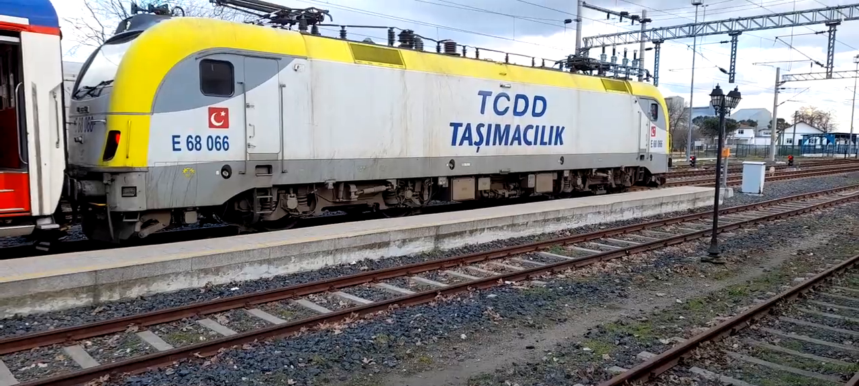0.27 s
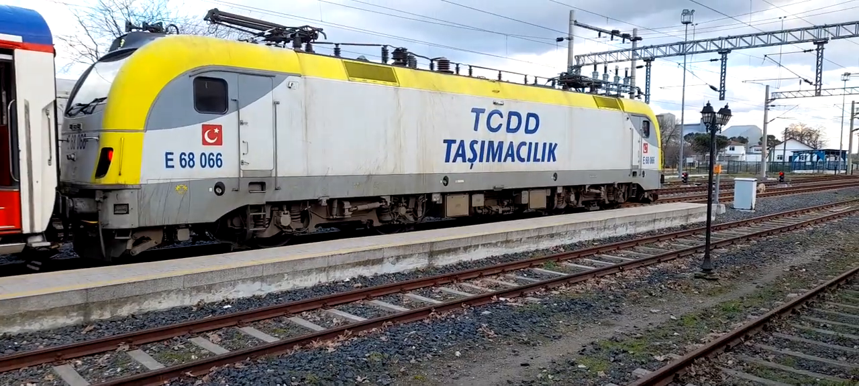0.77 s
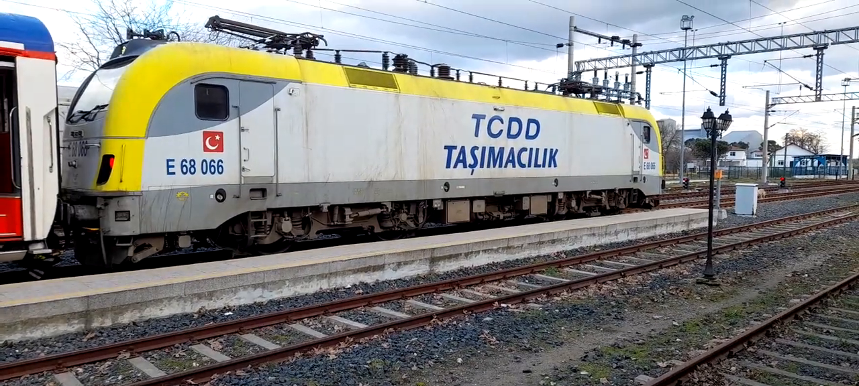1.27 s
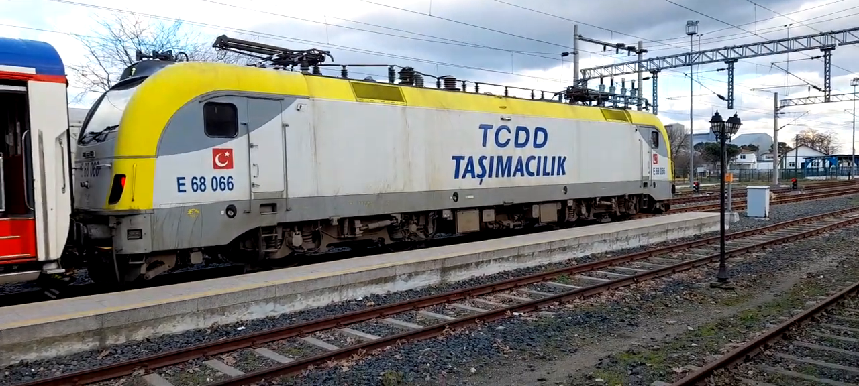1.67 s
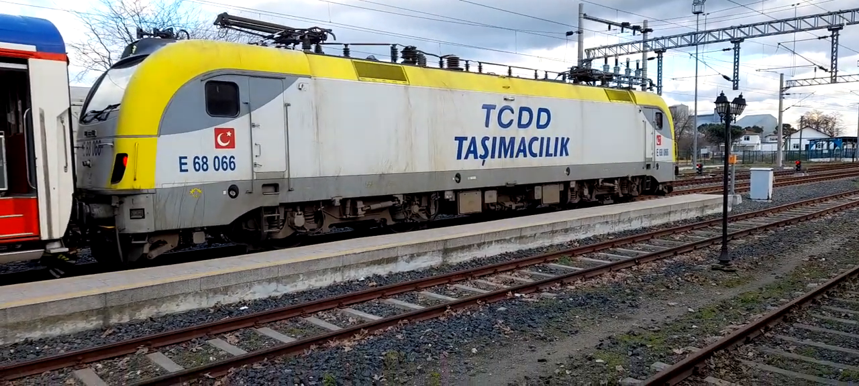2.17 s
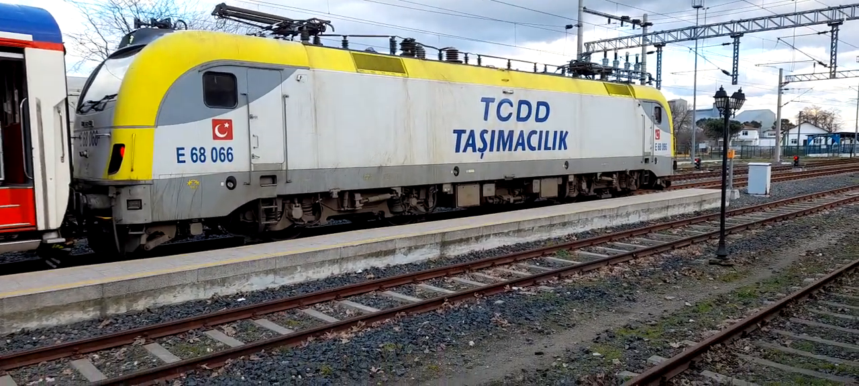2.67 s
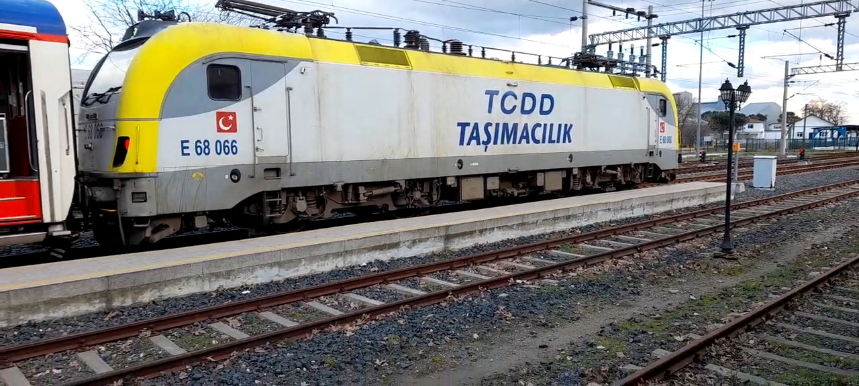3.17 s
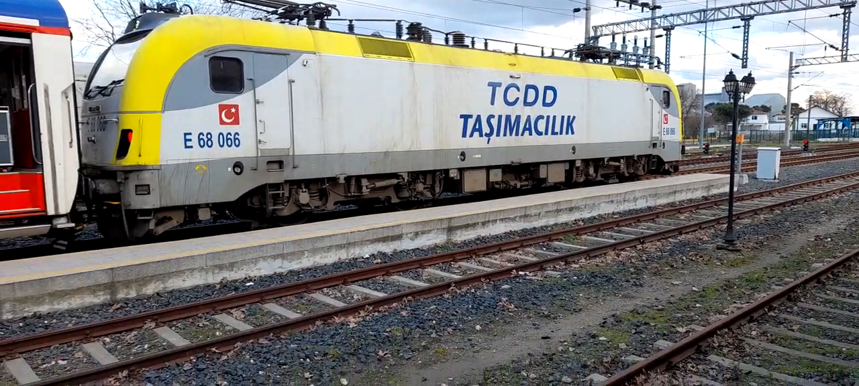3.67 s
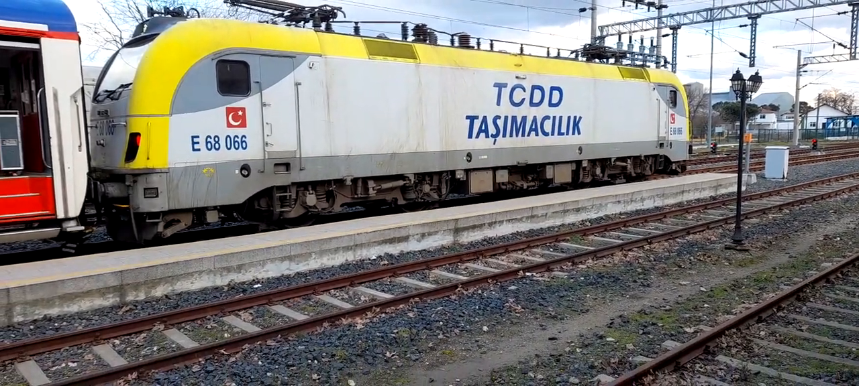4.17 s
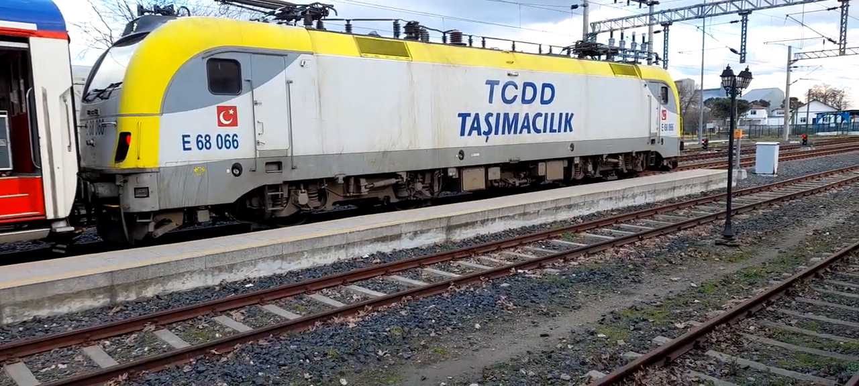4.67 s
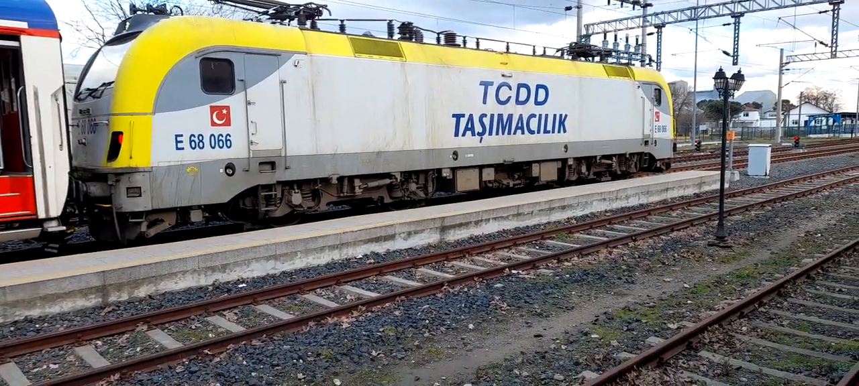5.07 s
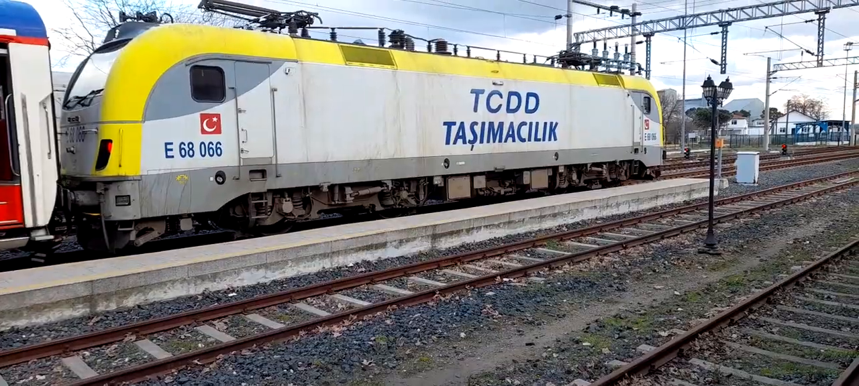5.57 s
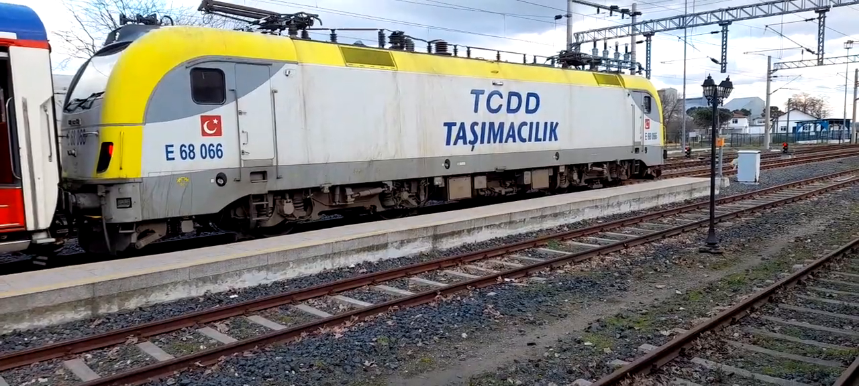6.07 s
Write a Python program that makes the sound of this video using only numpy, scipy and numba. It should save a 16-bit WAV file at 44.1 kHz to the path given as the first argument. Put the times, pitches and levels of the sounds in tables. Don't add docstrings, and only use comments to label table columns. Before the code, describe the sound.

Open station yard with a soft hum and low wind rumble. A few faint bird chirps come first. Then a standing locomotive's valve snaps open with a tiny rising whistle and blasts compressed air for about a second, shutting abruptly into a short reverberant tail. Later a thin, quiet leak hisses on while gusts increasingly thump the stereo phone microphone, strongest near the end and toward the right.

```python
import sys
import numpy as np
from scipy import signal
from scipy.fft import rfft, irfft, next_fast_len
from scipy.io import wavfile
from scipy.ndimage import uniform_filter1d
from numba import njit

SR = 44100
rng = np.random.default_rng(int(sys.argv[2]) if len(sys.argv) > 2 else 0)


def to_wav(s):
    ch = np.atleast_2d(s).T
    pcm = np.round(np.clip(ch, -1, 1) * 32767)
    wavfile.write(sys.argv[1], SR, pcm.astype(np.int16))


def undo_db(level):
    steps = np.asarray(level, float) / 20
    return 10 ** steps


N = 278932

# time in seconds, gain in dB.
PHONE_GAIN = [(0, -2.5), (1.2, 1.06), (2.4, -1.5), (2.75, -9), (3.2, -14), (3.9, -6.5), (4.7, -1),
              (5.5, -0.5), (6.33, -3)]
# frequency in Hz, lead of the left port in radians.
PORT_LEAD = [(0, -1.5), (780, 0.8), (2240, 3.5), (3360, 6), (5430, 13), (8270, 14), (13000, 17),
             (16600, 21), (22050, 27)]
# frequency in Hz, left level in dB per Hz, right level in dB per Hz.
YARD_SPECTRUM = [(200, -82.5, -85.5), (310, -76, -71), (400, -78, -78), (766, -82, -80.5),
                 (980.1, -80, -80), (1362.4, -86.5, -85.5), (1740, -84.5, -84), (2300, -91, -89),
                 (2799, -103.3, -101.9), (3867, -105.4, -107.2), (5480, -107.1, -110.0),
                 (6652, -106.2, -108.8), (8100, -119.9, -119.8), (13000, -109.5, -111.3)]
# frequency in Hz, level in dB per Hz.
RUMBLE_SPECTRUM = [(12, -41.5), (25, -11.5), (45, -4.5), (65, 2), (90, 0.5), (120, 0), (160, -9.5),
                   (210, -18), (280, -17), (400, -36.5), (700, -67.5)]
# time in seconds, level in dB.
BREEZE = [(0, -47), (1.0, -45), (2.4, -51.5), (3.1, -54), (3.5, -45.5), (4.3, -41.5), (5.2, -37.5),
          (5.6, -29.5), (6.08, -34.5), (6.2, -42), (6.33, -28.5)]
# centre in seconds, level in dB, left minus right in dB.
GUSTS = [(0.37, -37.5, -21), (0.67, -46, -5), (0.87, -51, -14), (1.12, -37.5, -2.5), (1.36, -41, -24),
         (1.59, -41, -8), (1.74, -42, -5), (2.0, -42, -7), (2.17, -43.5, -6), (2.34, -42.5, -14),
         (2.6, -42, -3), (2.78, -49, -13), (2.91, -47, -16), (3.29, -42.5, -15), (3.88, -34.0, -11),
         (3.99, -35, -6), (4.2, -35.5, -12), (4.53, -35, -9), (4.76, -40, 2.5), (5.07, -32, -4.5),
         (5.34, -33.5, -27), (5.7, -25.5, -11.5), (5.89, -41, -10.5)]
# centre in seconds, level in dB, left minus right in dB.
SIDE_GUSTS = [
    (.04, -43.5, -7),
    (.25, -46, 16),
    (3.62, -44.5, 0),
    (4.42, -38, 9),
    (5.5, -32.5, 13),
    (6.3, -33, -16),
]
# centre in seconds, peak in dB, pitch in Hz.
LEFT_BUFFETS = [
    (3.973, -28.5, 109),
    (4.439, -24, 121),
    (4.755, -30, 147),
    (5.513, -21, 133),
    (5.65, -18, 131),
    (5.67, -14, 110),
]
# centre in seconds, peak in dB, pitch in Hz.
RIGHT_BUFFETS = [(3.86, -23, 90.5), (3.902, -29, 96), (4.011, -20.5, 107.5), (4.463, -20.5, 89.3),
                 (4.534, -19.5, 95), (5.025, -20.5, 91), (5.081, -26, 93), (5.359, -16.5, 100),
                 (5.459, -32, 95.4), (5.654, -12.5, 171), (5.678, -8.5, 118.5), (5.69, -13, 244.4),
                 (5.714, -14, 238), (5.7219, -10.5, 137), (5.735, -19, 240), (5.745, -16, 99.3),
                 (5.874, -21, 129.8), (5.898, -14.5, 110), (6.286, -15, 94)]
# start in seconds, start pitch in Hz, length in seconds, peak in dB,
# left minus right in dB.
BIRDS = [
    (.096, 1780, 0.028, -52.5, -4.5),
    (.575, 2685, 0.017, -57, -3),
    (.587, 2580, 0.022, -50.5, 0),
    (.615, 2587, 0.029, -55, -1),
    (.823, 2650, 0.024, -50, -1),
    (.845, 2800, 0.017, -52, -6),
    (.895, 2960, .028, -58.5, 2),
    (.92, 2360, 0.031, -57.5, 0),
]
# peak in dB, left minus right in dB.
SQUEAK_HARMONICS = [
    (-59, -3),
    (-57.5, -11),
    (-66, 9.5),
    (-72, 5),
]
# start in seconds, start pitch in Hz, length in seconds, peak in dB,
# left minus right in dB.
PINGS = [
    (3.80, 2160, 0.087, -68, 3.28),
    (5.316, 4230, 0.0085, -54.5, 17),
    (6.045, 1150, 0.029, -54.5, -4),
    (6.262, 464, 0.057, -47.5, -2),
]
# centre in Hz, width in Hz, level in dB,
# start in seconds, stop in seconds.
HUMS = [
    (2090, 150, -63.5, 3.75, 7.9),
    (977, 100, -63, 2.85, 3.7),
    (300, 94, -50, 1.2, 2.6),
    (299, 32, -42, 1.898, 2.5),
    (288, 31, -58.5, 2, 2.95),
    (304.93, 84, -59.5, 4.9, 5.7),
]
# time in seconds, centre in Hz, peak in dB.
KNOCKS = [
    (4.565, 2200, -53),
    (5.318, 1700, -50.5),
    (3.355, 1000, -58),
]
# time in seconds, pitch in Hz, level in dB.
WHISTLE = [(1.372, 5000, -64.5), (1.384, 5402, -35.5), (1.390, 5681, -18.5), (1.400, 5872, -8),
           (1.410, 7572, -13), (1.420, 8605, -13), (1.432, 11300, -21.5), (1.445, 12000, -22.5),
           (1.47, 12280, -45)]
# frequency in Hz, left level in dB per Hz, right level in dB per Hz.
BLAST_SPECTRUM = [(325.3, -64.5, -56.5), (650, -66, -68), (1270, -64.5, -60.5), (1750, -63.5, -54),
                  (2500, -59, -56.5), (3823, -62, -63), (4166.7, -54.5, -60), (5495, -54.5, -63.5),
                  (6660, -51, -48), (7630, -66, -59), (8342.5, -67, -62.5), (10500, -56, -61),
                  (12000, -50.5, -59.5), (14800, -59, -53)]
# frequency in Hz, left level in dB per Hz,
# right level in dB per Hz.
TAIL_SPECTRUM = [(201, -79, -76), (298.2, -72.5, -66), (430, -77, -77), (799, -78, -74.5),
                 (1760, -69.5, -66), (3700, -68.5, -68), (5500, -66, -72.5), (6700, -64.5, -62.5),
                 (8100, -81, -81), (12000, -70, -71), (15000, -70, -70.5)]
# frequency in Hz, left level in dB per Hz, right level in dB per Hz.
LEAK_SPECTRUM = [(2200, -91.5, -87), (2940, -99, -96.5), (3440, -92, -89.5), (4350, -99, -101.4),
                 (5940, -93.5, -100), (6930, -99.0, -92.5), (7440, -104.0, -103.2), (8570, -99.5, -99.5),
                 (10200, -100.5, -96.5), (11000, -104, -105), (12000, -98.5, -99.4), (13500, -96.5, -95.5),
                 (14380, -96, -100), (15500, -101.2, -103.1)]

VALVE_SHUTS_S = 2.423


def curves(table):
    s, *columns = np.transpose(table)
    return np.array([np.interp(np.arange(N) / SR, s, column) for column in columns])


def walk(rate):
    hold = int(SR / rate)
    steps = np.repeat(rng.standard_normal(400), hold)[:N]
    return 1.3 * uniform_filter1d(uniform_filter1d(steps, hold), hold)


def split(x, hz):
    low = signal.sosfiltfilt(signal.butter(2, hz, fs=SR, output="sos"), x)
    return low, x - low


def colour(x, table, under_db=-39.5, tilt=0, swell_db=0, flicker_db=0, rate=12, count=1):
    size = next_fast_len(N)
    octave = np.log2(np.fft.rfftfreq(size, 1 / SR) + 1)
    hz, *columns = np.transpose(table)
    edge = under_db * np.maximum(np.log2(hz[0]) - octave, 0)
    levels = [np.interp(octave, np.log2(hz), column) + edge for column in columns]
    shaped = rfft(x, size) * undo_db(levels) * np.sqrt(SR / 2)
    out = 0
    for centre in np.arange(7, 14.1, 1 / count):
        distance = np.clip(np.clip(octave, 7, 14) - centre, -1 / count, 1 / count)
        band = np.cos(distance * count * np.pi / 2) ** 2
        gain_db = swell_db + tilt * (centre - 10) + flicker_db * walk(rate)
        out = out + irfft(shaped * band, size)[:, :N] * undo_db(gain_db)
    return out


@njit
def resonator(x, hz, width):
    out, band, low = np.empty(len(x)), 0., 0.
    for i in range(len(x)):
        g, damping = np.tan(np.pi * hz[i] / SR), width[i] / hz[i]
        v = (band + g * (x[i] - low)) / (1 + g * (g + damping))
        band, low = 2 * v - band, low + 2 * g * v
        out[i] = damping * v
    return out


def ports(x, lead_scale):
    size = next_fast_len(N)
    lead = lead_scale * np.interp(np.fft.rfftfreq(size, 1 / SR), *np.transpose(PORT_LEAD))
    return np.array([irfft(rfft(x, size) * np.exp(1j * lead), size)[:N], x])


def echoes(x, echo_db, t60):
    t = np.arange(SR // 2) / SR
    path = rng.standard_normal((2, len(t))) * undo_db(-60 * t / t60) * (t > .001)
    path = path * undo_db(echo_db) / np.linalg.norm(path[0]) + (t == 0)
    path = path / np.linalg.norm(path, axis=1, keepdims=True)
    return signal.fftconvolve(x, path, axes=1)[:, :N]


def yard():
    dulling = 0.92 * np.maximum(np.arange(N) / SR - 2.87, 0)
    tilt = -0.03 - dulling
    common, own = rng.standard_normal(N), rng.standard_normal((2, N))
    common = np.array([common, np.roll(common, int(0.00041 * SR))])
    share = 0.6
    exchange = share * common + (np.sqrt(1 - share ** 2) - 1) * own
    exchange = signal.sosfilt(signal.butter(2, 2600, fs=SR, output="sos"), exchange)
    return colour(own + exchange, YARD_SPECTRUM, under_db=-11.5, tilt=tilt,
                  swell_db=curves(PHONE_GAIN)[0], flicker_db=1.64, rate=8, count=2)


def wind_gain():
    t, side = np.arange(N) / SR, np.array([[1], [-1]])
    windward_db, wander_db, gust_s = 2.5, -2, .055
    wander = wander_db * np.array([walk(8), walk(9)])
    power = undo_db(2 * (curves(BREEZE) - side * windward_db / 2 + wander))
    for s, db, lean_db in list(GUSTS) + list(SIDE_GUSTS):
        lean = 2 / (1 + undo_db(-2 * side * lean_db))
        power = power + undo_db(2 * db) * lean * np.exp(-((t - s) / gust_s) ** 2)
    return np.sqrt(power)


def wind():
    lumps = undo_db(2.0 * np.array([walk(28), walk(28)]))
    rumble = colour(rng.standard_normal((2, N)) * lumps, RUMBLE_SPECTRUM)
    rumble = rumble / rumble.std(axis=1, keepdims=True) * wind_gain()
    out = signal.sosfilt(signal.butter(3, 38, "high", fs=SR, output="sos"), rumble)
    t = np.arange(-SR // 40, SR // 40) / SR
    for port, buffets in zip(out, (LEFT_BUFFETS, RIGHT_BUFFETS)):
        for s, peak_db, hz in buffets:
            swing = -np.sin(2 * np.pi * hz * t) * np.exp(-(t * hz / 0.62) ** 2)
            port[int((s + t[0]) * SR):][:len(t)] += undo_db(peak_db - 1.0) * swing
    return out


def chirps():
    squeak_s, squeak_hz, squeak_length_s = .798, 1510, .05
    squeak = [(squeak_s, (k + 1) * squeak_hz, squeak_length_s, *row) for k, row in enumerate(SQUEAK_HARMONICS)]
    kinds = (BIRDS, 6.2), (squeak, 1.7), (PINGS, -0.623)
    dry = np.zeros((2, N))
    hoarse = uniform_filter1d(rng.standard_normal(N), 60) * 8
    for notes, fall in kinds:
        for s, start_hz, length, peak_db, pan_db in notes:
            end_hz = start_hz * (1 - fall * length)
            span = slice(int(s * SR), min(int((s + length) * SR), N))
            glide = np.linspace(start_hz, end_hz, span.stop - span.start)
            pitch = glide * (1 + 0.01736 * hoarse[span])
            note = np.sin(2 * np.pi * np.cumsum(pitch) / SR) * np.sqrt(np.hanning(len(pitch)))
            dry[:, span] += note * undo_db(peak_db + 4.5 + np.array([[pan_db], [-pan_db]]) / 2)
    return echoes(dry, -0.97, .35)


def machinery():
    t, out = np.arange(N) / SR, np.zeros(N)
    for hz, width, db, start, stop in HUMS:
        hum = resonator(rng.standard_normal(N), np.full(N, 1. * hz), np.full(N, 1. * width))
        wobble = undo_db(1.5 * walk(10))
        fade = np.clip(np.minimum(t - start, stop - t) / 0.1, 0, 1)
        out += hum / hum.std() * undo_db(db) * wobble * fade
    for s, hz, peak_db in KNOCKS:
        centre = np.full(N, 1. * hz)
        knock = resonator(resonator(rng.standard_normal(N), centre, centre), centre, centre)
        decay = np.exp(-np.maximum(t - s, 0) / .012) * (t > s)
        out += undo_db(peak_db) * knock / knock.std() * decay
    return echoes(ports(out, 1.5) * undo_db([[-3], [1.5]]), -17, .15)


def valve_db():
    t = np.arange(N) / SR
    opens_s, opening_db_per_s, sag_db_per_s = 1.403, 1151, 1.5
    shutting_db_per_s, knee_s = 379.5, 0.01
    dip_s, dip_db, dip_length_s, surge_db = 1.48, -2, 0.12, 0.5
    opening = -opening_db_per_s * 0.003 * np.logaddexp(0, (opens_s - t) / .004)
    dip = dip_db * np.exp(-((t - dip_s) / dip_length_s) ** 2)
    surge = surge_db * np.clip((dip_s - t) / .05, 0, 1)
    sag = sag_db_per_s * (t - opens_s)
    shut = shutting_db_per_s * knee_s * np.logaddexp(0, (t - VALVE_SHUTS_S) / knee_s)
    return opening + dip + surge - sag - shut


def opening_whistle():
    hz, level_db = curves(WHISTLE)
    width = 420 * (hz / 6000) ** 2.0
    tone = resonator(resonator(rng.standard_normal(N), hz, width), hz, width) / np.sqrt(width)
    return tone / tone.std() * undo_db(level_db + 13.0) * (level_db > -44)


def lingering(gain, t60):
    pole = undo_db(-120 / (t60 * SR))
    return np.sqrt(signal.lfilter([1 - pole], [1, -pole], gain ** 2))


def jet(gain, scatter_db, lead_scale):
    core = ports(rng.standard_normal(N) * gain, lead_scale)
    low, high = split(rng.standard_normal((2, N)) * lingering(gain, 0.061), 1900)
    fringes = 0.36 * low + high
    return (core + fringes * undo_db(scatter_db)) / np.sqrt(1 + undo_db(2 * scatter_db))


def blast():
    flow = undo_db(valve_db() + 0.46 * walk(13.894))
    whistle = ports(opening_whistle(), 0.81357)
    low, high = split(jet(flow, -0.55, 0.95), 7800)
    bright = np.maximum.accumulate(np.clip(flow, 0, 1)) ** 0.47
    near = echoes(low + high * bright, -4.5, 0.08) + echoes(whistle, -1.3, 0.22)
    near = near - .55 * split(near, 420)[0]
    low, high = split(rng.standard_normal((2, N)), 7600)
    seep = undo_db(-43) * np.interp(np.arange(N) / SR, [2.4, 2.6, 3.7, 4.2], [0, 1, 1, 0])
    tail = low * (lingering(flow, 0.65) + seep) + high * (lingering(flow, 0.47) + undo_db(-8) * seep)
    direct = colour(near, BLAST_SPECTRUM, under_db=-21.5, flicker_db=0.44, rate=13, count=2)
    return direct + colour(tail, TAIL_SPECTRUM, under_db=-13.5, flicker_db=2.5, rate=20)


def leak():
    opens_s, opening_db_per_s, seep_db, settles_s = 3.75, 139, -21.5, 0.5
    t = np.arange(N) / SR
    opening = undo_db(opening_db_per_s * np.minimum(t - opens_s, 0))
    seep = undo_db(seep_db) * (t > VALVE_SHUTS_S)
    flow = undo_db(curves(PHONE_GAIN)[0]) * (opening + seep)
    fresh = np.exp(-np.maximum(t - opens_s, 0) / settles_s)
    return colour(echoes(jet(flow, .4, 1.5), -9, .06), LEAK_SPECTRUM, under_db=-12,
                  tilt=2.5 * fresh, swell_db=-6 * fresh, flicker_db=.9, rate=8)


def scene():
    return blast() + leak() + yard() + machinery() + wind() + chirps()


def band_limit(x):
    return signal.sosfilt(signal.butter(12, 17010, fs=SR, output="sos"), x)


def record(dry):
    size = next_fast_len(N)
    passed = np.clip((15725 - np.fft.rfftfreq(size, 1 / SR)) / 40, 0, 1)
    rounded = np.tanh(0.81 * dry) / 0.80086
    mix = irfft(rfft(rounded, size) * passed, size)[:, :N]
    return band_limit(mix)


dry = scene()
out = record(dry)
to_wav(out)
```